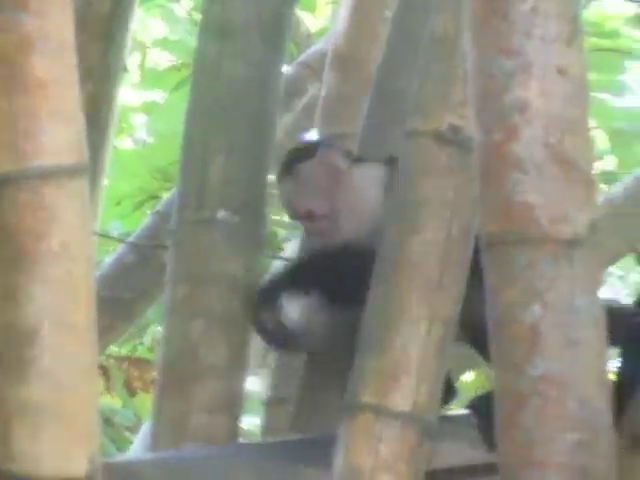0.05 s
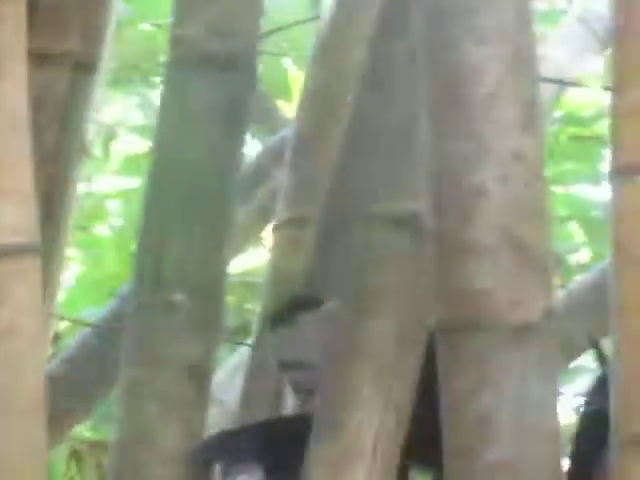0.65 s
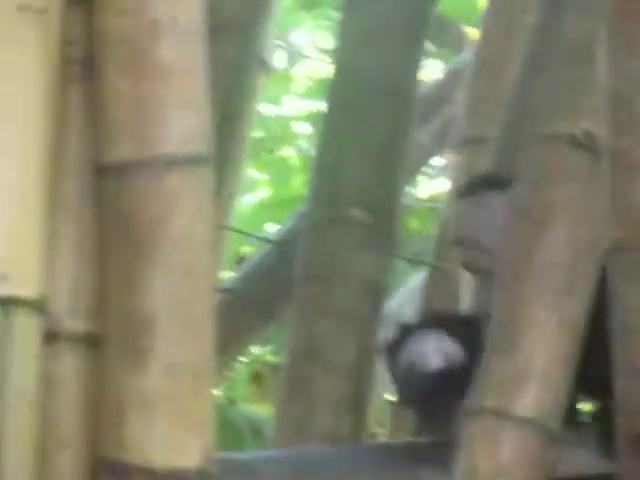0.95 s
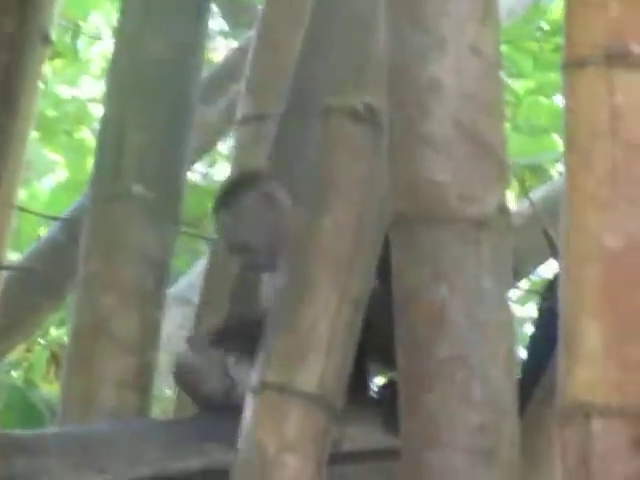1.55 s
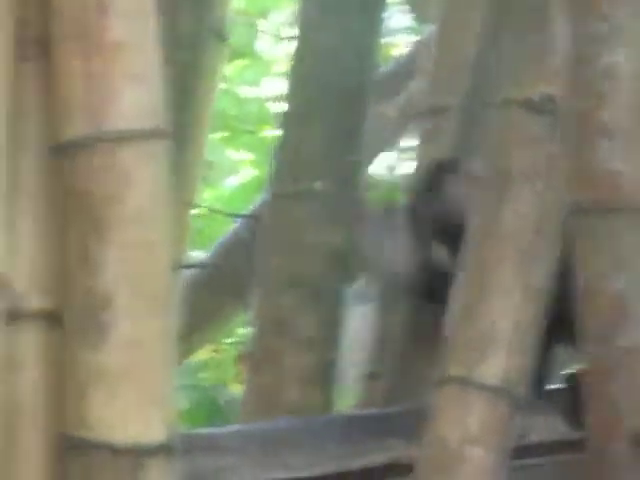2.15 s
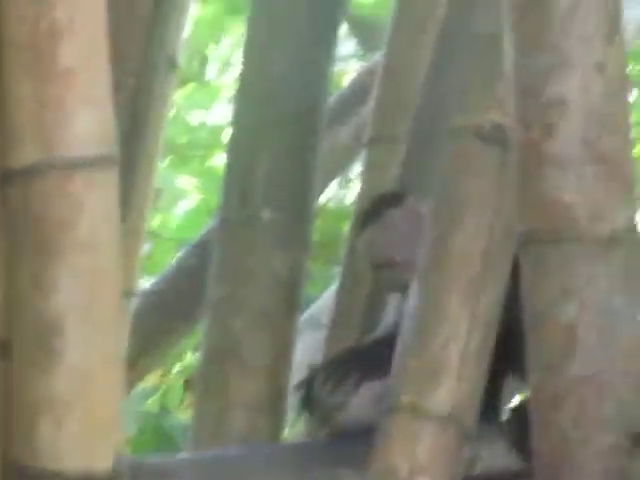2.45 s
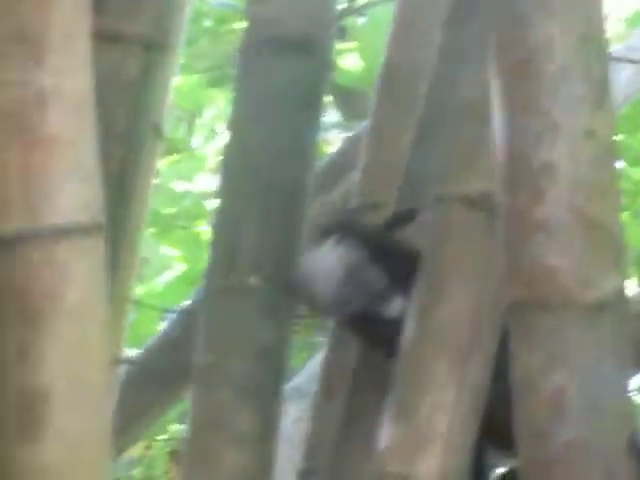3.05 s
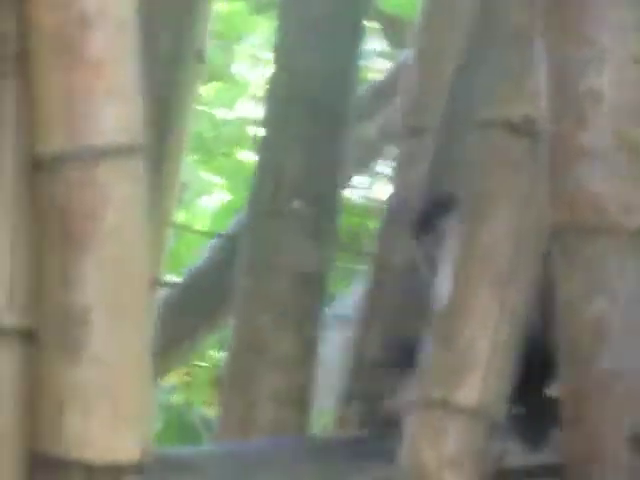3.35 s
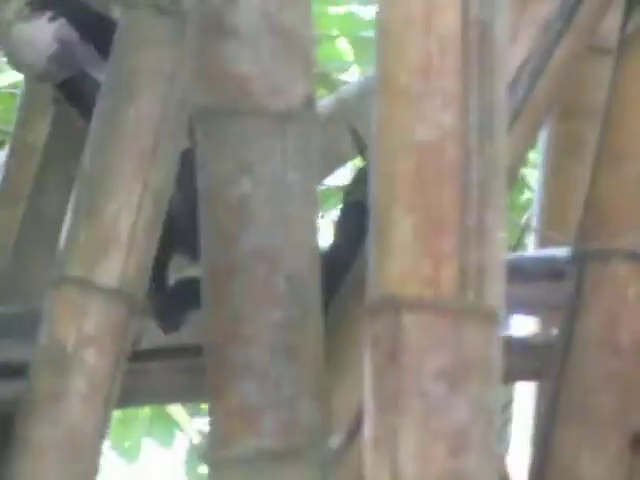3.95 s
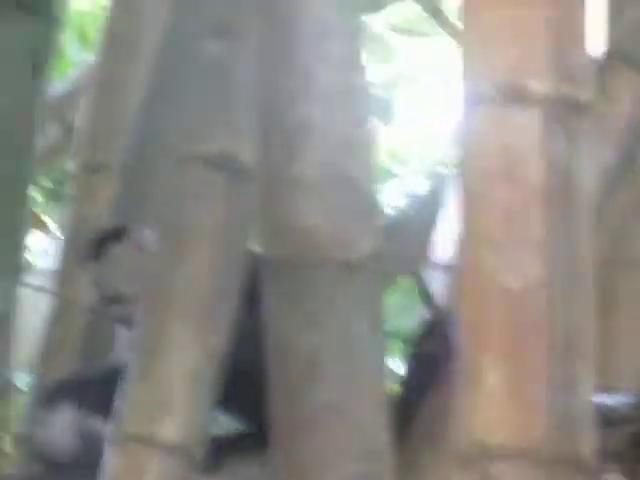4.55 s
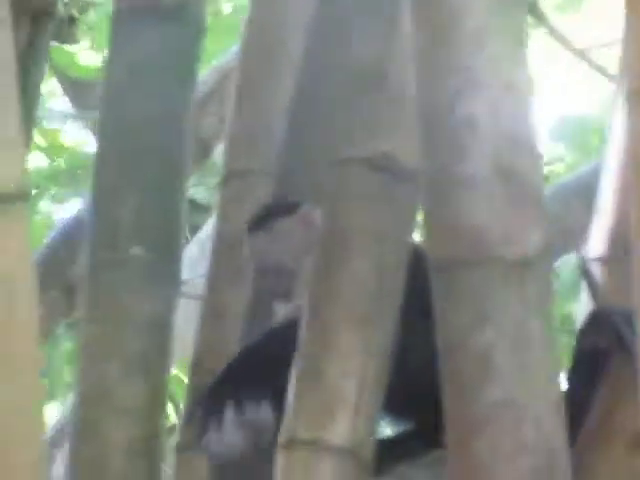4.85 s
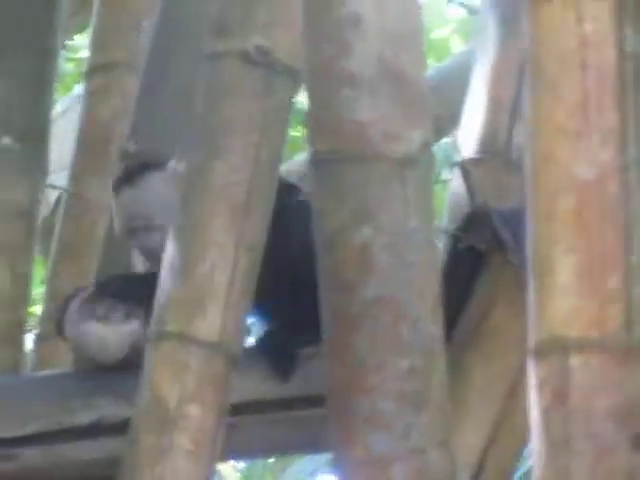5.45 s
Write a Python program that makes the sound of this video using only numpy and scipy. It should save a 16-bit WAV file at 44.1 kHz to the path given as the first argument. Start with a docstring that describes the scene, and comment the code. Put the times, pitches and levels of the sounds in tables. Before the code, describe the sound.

A monkey bangs a coconut on a wooden beam six times, about a second apart. Each blow is a sharp crack of hard shell with a hollow knock, ringing briefly in a large bamboo-filled enclosure. A soft wash of air runs underneath. In the first half a small bird gives two faint, high calls. Between blows come slight rustles of the nut, soft bumps on the microphone and, later, very faint distant hoots.

```python
"""Over a steady wash of air, a monkey pounds a coconut on a wooden beam: six blows about a second apart.
Each is a crack of the hard shell, then the hollow knock of nut and beam, scattered by the bamboo poles
of the enclosure and ringing on in the hall. A small bird gives two thin, high calls.
Between blows come faint rustles of the handled nut, soft bumps on the camera and far hoots."""
import sys
import numpy as np
from scipy import signal
from scipy.fft import rfft, irfft
from scipy.io import wavfile

SR = 44100
rng = np.random.default_rng(int(sys.argv[2]) if len(sys.argv) > 2 else 0)


def generate_wav(sig):
    """Save sig (samples, or channels by samples) to the path in sys.argv[1] as 16-bit PCM at SR."""
    pcm = np.round(np.clip(np.atleast_2d(sig).T, -1, 1) * 32767).astype(np.int16)
    wavfile.write(sys.argv[1], SR, pcm)


N = 250664

# hall decay: freq_hz, t60_s
HALL_DECAY = [(150, 0.32), (600, 0.94), (1500, 0.72), (3000, 0.77), (6000, 0.65), (9000, 0.59),
              (14000, 0.23)]


def from_db(db):
    """Decibels to gain."""
    return 10 ** (np.asarray(db) / 20)


def rms_one(x):
    """Scale to rms 1."""
    return x / np.sqrt(np.mean(x ** 2) + 1e-20)


def at_hz(points, hz):
    """Read a table on a log-frequency axis."""
    freq_hz, values = np.transpose(points)
    return np.interp(np.log(hz), np.log(freq_hz), values)


def bins_hz(size):
    """FFT bin frequencies, floored at 1 Hz."""
    return np.maximum(np.fft.rfftfreq(size, 1 / SR), 1)


def add(out, start_s, sound):
    """Mix a sound in at start_s."""
    start = round(start_s * SR)
    out[:, start:start + sound.shape[-1]] += sound[..., :N - start]


def fade(t, t60_s):
    """Exponential decay, 60 dB in t60_s."""
    return 1000 ** (-t / t60_s)


def rise(t, build_s):
    """Exponential approach to 1."""
    return 1 - np.exp(-t / build_s)


def swell(length_s):
    """Half-sine envelope."""
    return np.sin(np.linspace(0, np.pi, int(length_s * SR)))


def colour(x, spectrum):
    """Minimum-phase filter from rows of freq_hz, gain_db: nothing sounds before its cause."""
    size = 2 * len(x)
    cepstrum = irfft(np.log(from_db(at_hz(spectrum, bins_hz(size)))), size)
    cepstrum[1:len(x)] *= 2
    response = np.exp(rfft(cepstrum[:len(x)], size))
    return irfft(rfft(x, size) * response, size)[:len(x)]


def noise(spectrum, size):
    """Diffuse stereo noise, rms 1, from rows of freq_hz, density_db; channels agree best in the mids."""
    # left-right likeness: freq_hz, correlation
    likeness = [(40, -0.83), (110, -0.82), (190, -0.8), (300, -0.28), (600, 0.85), (1200, 0.88),
                (3000, 0.83), (7000, 0.62), (13000, -0.25)]
    hz = bins_hz(size)
    alike = np.clip(at_hz(likeness, hz), -.99, .99)
    mid, side = rfft(rng.standard_normal((2, size)))
    stereo = np.sqrt(1 + alike) * mid + np.sqrt(1 - alike) * side * [[1], [-1]]
    return rms_one(irfft(stereo * from_db(at_hz(spectrum, hz)), size))


def air(wash_db=-54.0):
    """Steady wash of air, faintly pitched at a few resonances."""
    # air colour: freq_hz, density_db
    spectrum = [(18, -62.5), (30, -17.5), (116, -14.5), (163, -12), (205, -8), (247, -9), (328, -10.5),
                (662, -10), (735, -9), (859, -11), (1000, -12), (2190, -16), (4090, -20.5), (7060, -27),
                (15000, -47.5)]
    # narrow resonances: centre_hz, width_hz, level_db
    resonances = [(628, 140, -63.5), (1237, 65, -74), (1444, 32, -66)]
    out = from_db(wash_db) * noise(spectrum, N)
    for centre_hz, width_hz, level_db in resonances:
        peak = signal.iirpeak(centre_hz, centre_hz / width_hz, fs=SR)
        out += from_db(level_db) * rms_one(signal.lfilter(*peak, rng.standard_normal(N)))
    return out


def rumble(level_db=-67.5):
    """Faint, steady low noise."""
    spectrum = [(20, -15), (60, -3.5), (120, 0.5), (220, -9.5), (500, -49), (2000, -76.5)]
    return from_db(level_db) * noise(spectrum, N)


def crack(t, tilt_db_per_oct, gain_db=1.5, crush_db=2.0, settle_db=-4.0):
    """One sharp contact, tiny fractures as the surface crushes, then a weaker settling of the shell."""
    # crack colour: freq_hz, gain_db
    spectrum = [(100, -25), (500, -11), (1150, 0), (1800, 6), (2350, 2), (3100, 5.5), (4000, -7.5),
                (5200, 4), (7800, 0.5), (10000, -9), (13000, -27.5), (16000, -37)]
    fractures = rng.standard_normal(len(t)) * fade(t, t60_s=0.0034)
    settling = rng.standard_normal(len(t)) * fade(t, t60_s=0.048)
    fractures *= from_db(crush_db) / np.linalg.norm(fractures)
    settling *= from_db(settle_db) / np.linalg.norm(settling)
    contact = t == 0
    force = np.roll(fractures + settling, SR // 4000) - contact   # contact leads by 0.25 ms
    tilted = [(hz, db + tilt_db_per_oct * np.log2(np.clip(hz, 2000, 9000) / 4000))
              for hz, db in spectrum]
    return from_db(gain_db) * colour(force, tilted)


def rattle(t, gain_db=-21.5, t60_s=0.11, build_s=0.00047):
    """Dense clatter of coloured noise that builds at once and dies within a tenth of a second."""
    # rattle colour: freq_hz, density_db
    spectrum = [(40, -46.5), (130, -12.5), (220, -5.5), (400, 4.5), (900, 6.5), (1800, 2.5), (3100, -3),
                (3900, -14.5), (5200, -15.5), (8000, -33), (11000, -32), (15000, -52)]
    envelope = fade(t, t60_s) * rise(t, build_s)
    clatter = colour(rng.standard_normal(len(t)) * envelope, spectrum)
    return from_db(gain_db) * clatter * np.linalg.norm(envelope) / np.linalg.norm(clatter)


def shell(t, spot_hz, contact_s=0.00028, spot_width_oct=0.2, off_spot_db=-11.5):
    """The hard shell rings briefly; the spot that lands favours modes near the spot_hz pitches."""
    # shell modes: pitch_hz, level_db, t60_s
    modes = [(900, -14.5, 0.056), (1183, -29, 0.053), (1834, -16, 0.034), (2754, -18, 0.034),
             (3080, -20.5, 0.015), (3340, -24.5, 0.03), (5050, -32, 0.051)]
    pitch_hz, level_db, t60_s = np.transpose(modes)[:, :, None]
    distance_oct = np.abs(np.log2(pitch_hz / spot_hz)).min(axis=1, keepdims=True)
    off_spot = 1 - np.exp(-(distance_oct / spot_width_oct) ** 2)
    strength = from_db(level_db + off_spot_db * off_spot)
    rings = strength * np.sin(2 * np.pi * pitch_hz * t) * fade(t, t60_s)
    return rings.sum(axis=0) * rise(t, contact_s)


def knock(t, contact_s=0.001, spread_db=1.38):
    """Nut and beam take up the blow, then ring; each blow shares out the force differently."""
    # modes of the nut on the beam: pitch_hz, level_db, t60_s
    modes = [(190, -32, 0.028), (348, -24, 0.16), (469.6, -10, 0.029), (632, -0.5, 0.032),
             (702, -12.5, 0.059), (775, -7.5, 0.033), (867, -12, 0.028), (980, -26, 0.06),
             (1069, -21, 0.059), (1217, -21, 0.057), (1285, -8.5, 0.013), (1484, -18, 0.023),
             (1598, -14.5, 0.012), (1826, -17.5, 0.014)]
    pitch_hz, level_db, t60_s = np.transpose(modes)[:, :, None]
    strength = from_db(level_db + spread_db * rng.standard_normal(pitch_hz.shape))
    rings = strength * np.sin(2 * np.pi * pitch_hz * t) * fade(t, t60_s)
    low_cut = signal.butter(2, 175, "high", fs=SR, output="sos")   # a small body radiates little bass
    return signal.sosfilt(low_cut, rings.sum(axis=0) * rise(t, contact_s))


def seating(t, level_db=-10.0, pitch_hz=1900, t60_s=0.0011):
    """Short snap as the nut bottoms out on the beam."""
    return from_db(level_db) * np.sin(2 * np.pi * pitch_hz * t) * fade(t, t60_s)


def hall_wash(t, gain_db=-31.0, build_s=0.002):
    """Diffuse reverberation builds, then dies away; the mids last longest."""
    # reverberation colour: freq_hz, density_db
    spectrum = [(59, -52), (100, -31), (208, -21), (324, -12), (502, -15), (594, -1.5), (904, -9.5),
                (1070, -4.5), (1630, -11), (2690, -12), (3920, -18), (5040, -16.5), (6910, -22),
                (9260, -27.5), (15000, -43)]
    wash = rfft(noise(spectrum, len(t)))
    centres_hz, t60s_s = np.transpose(HALL_DECAY)
    log_hz = np.log(bins_hz(len(t)))
    bands = [np.interp(log_hz, np.log(centres_hz), row) for row in np.eye(len(centres_hz))]
    tail = sum(irfft(wash * band, len(t)) * fade(t, t60_s) for band, t60_s in zip(bands, t60s_s))
    return from_db(gain_db) * tail * rise(t, build_s)


def reflect(x, envelope, gain_db):
    """Pass x through dense random reflections that follow the envelope."""
    paths = rng.standard_normal(len(x)) * envelope
    paths *= from_db(gain_db) / np.linalg.norm(paths)
    return signal.fftconvolve(x, paths)[:len(x)]


def hall_ring(body, t, gain_db=-21.0, t60_s=1.0, build_s=0.032):
    """The nut's notes linger in the hall."""
    tail = reflect(body, fade(t, t60_s) * rise(t, build_s), gain_db)
    return colour(tail, [(200, -12), (640, -8.0), (900, 1), (1200, 1), (2500, 5.0)])


def flutter(body, bounces=5):
    """Each group of reflectors returns an evenly spaced, dying run of echoes."""
    # nearest poles, far walls, across the hall: first_s, gap_s, gain_db, loss_db_per_bounce
    reflectors = [(0.0043, .0058, -15, 1.0), (.126, 0.012, -30.5, 2.3), (.0765, 0.091, -26.5, 6.5)]
    out = np.zeros_like(body)
    for first_s, gap_s, gain_db, loss_db in reflectors:
        for bounce in range(bounces):
            lag = round((first_s + bounce * gap_s) * SR)
            out[lag:] += from_db(gain_db - bounce * loss_db) * body[:len(body) - lag]
    return out


def scatter(body, t, gain_db=-11.5, t60_s=0.093, build_s=0.013, delay_s=0.0093):
    """The thicket of poles scatters the knock, filling out its first tens of milliseconds."""
    late_s = np.maximum(t - delay_s, 0)
    echoes = reflect(body, fade(late_s, t60_s) * rise(late_s, build_s), gain_db)
    return colour(echoes, [(220, -9), (350, 4), (600, -10), (900, 4.5), (1300, 5.5), (2500, -0.5)])


def blows(shell_lag_s=0.000821, knock_lag_s=0.001185, seat_lag_s=0.0032):
    """Crack first; shell and body ring once the surface yields. Returns direct and diffuse sound."""
    # blows, levels relative: start_s, knock_db, crack_db, tilt_db_per_oct, rattle_db, hall_db,
    # shell_db, low_spot_hz, high_spot_hz
    strikes = [(0.4752, 0.9, -5, -1, 2, -0.4, 2, 900, 5050),
               (1.4009, -1, -2, -4.5, -0.5, -1.5, 1, 1740, 3080),
               (2.2109, -0.7, 0, -1, 3.5, 1.9, -1.1, 1200, 3160),
               (3.3647, -2.5, 2.2, -1, 4, 3, -1.2, 2060, 2650),
               (4.3316, -0.5, -2, 5.5, 4, 0.95, -2.4, 1820, 3800),
               (5.414, -1.1, -3, 2, 2.2, -0.6, 1, 1150, 3470)]
    direct, diffuse = np.zeros((2, 2, N))
    t = np.arange(SR) / SR
    for start_s, knock_db, crack_db, tilt_db_per_oct, rattle_db, hall_db, shell_db, *spot_hz in strikes:
        body = from_db(knock_db) * knock(t)
        ring = from_db(shell_db) * shell(t, spot_hz)
        add(direct, start_s, from_db(crack_db) * crack(t, tilt_db_per_oct))
        add(direct, start_s, from_db(rattle_db) * rattle(t))
        add(direct, start_s + shell_lag_s, ring)
        add(direct, start_s + knock_lag_s, body + flutter(body) + scatter(body + ring, t))
        add(direct, start_s + seat_lag_s, seating(t))
        add(diffuse, start_s, from_db(hall_db) * (hall_wash(t) + hall_ring(body + ring, t)))
    return direct, diffuse


def whistle(length_s, first_hz, last_hz):
    """Pure note that swells, glides and fades."""
    envelope = swell(length_s)
    pitch_hz = np.linspace(first_hz, last_hz, len(envelope))
    return envelope * np.sin(2 * np.pi * np.cumsum(pitch_hz) / SR)


def bird(notes=4, step_s=0.061, note_s=0.0275, slide_hz=750, arch_hz=300, dry_db=-6.0, wet_db=1.5):
    """Arching runs of thin high notes, each sliding down, smeared by the hall."""
    # bird calls: start_s, pitch_hz, relative_db
    calls = [(0.96, 7100, -54), (2.75, 7900, -58)]
    out = np.zeros((2, N))
    for start_s, pitch_hz, relative_db in calls:
        for index, arch in enumerate(np.sin(np.linspace(0, np.pi, notes))):
            note_hz = pitch_hz + arch_hz * arch
            note = whistle(note_s, note_hz + slide_hz / 2, note_hz - slide_hz / 2)
            add(out, start_s + index * step_s, from_db(relative_db) * note)
    t = np.arange(SR // 2) / SR
    mean_pitch_hz = np.mean(calls, axis=0)[1]
    decay = fade(t, at_hz(HALL_DECAY, mean_pitch_hz))
    echoes = rms_one(rng.standard_normal((2, len(t))) * decay) / np.sqrt(len(t))
    wet = signal.fftconvolve(out, echoes, axes=1)[:, :N]
    return from_db(dry_db) * out + from_db(wet_db) * wet


def touches(events, spectrum):
    """Brief swells of friction noise."""
    out = np.zeros((2, N))
    for start_s, length_s, level_db in events:
        envelope = swell(length_s)
        friction = noise(spectrum, SR // 2)[:, :len(envelope)]
        add(out, start_s, from_db(level_db) * envelope * friction)
    return out


def rustles():
    """The nut rustles as it is handled."""
    # handling: start_s, length_s, level_db
    rubs = [(1.074, 0.035, -49), (1.208, 0.025, -53), (3.661, 0.016, -51), (5.158, 0.04, -49.5),
            (5.19, 0.11, -56.5)]
    return touches(rubs, [(100, 0), (850, -0.5), (2500, -8.0), (7000, -8.5), (15000, -36)])


def bumps(right_gain=0.71):
    """Soft bumps rock the camera, moving its two microphones in opposite senses."""
    # bumps on the camera body: start_s, length_s, level_db
    nudges = [(2.535, 0.03, -46), (2.962, 0.019, -25), (3.03, 0.29, -53.5), (3.295, 0.04, -36),
              (3.312, 0.016, -33), (3.487, 0.025, -41.5), (4.255, 0.037, -46)]
    thuds = touches(nudges, [(20, -9), (70, -2), (200, -9.0), (350, -29), (2000, -75)])[0]
    return thuds * [[1], [-right_gain]]


def hoots(rise_oct_per_s=0.2):
    """Distant calls drifting upwards; only the strongest partial carries."""
    # far hoots: start_s, length_s, pitch_hz, level_db
    calls = [(3.12, 0.15, 1066, -56.5), (3.93, 0.18, 658, -54.5), (3.98, 0.18, 872, -57),
             (4.75, 0.25, 826, -56)]
    out = np.zeros((2, N))
    for start_s, length_s, pitch_hz, level_db in calls:
        last_hz = pitch_hz * 2 ** (rise_oct_per_s * length_s)
        add(out, start_s, from_db(level_db) * whistle(length_s, pitch_hz, last_hz))
    return out


def bass_spread(x, cutoff_hz=150):
    """Closely spaced microphones turn a small bass mismatch into opposite swings left and right."""
    bass = signal.sosfilt(signal.butter(4, cutoff_hz, fs=SR, output="sos"), x.mean(axis=0))
    return x + bass * [[1], [-1]]


def microphone_dip(x, centre_hz=3900, q=1.47, depth=0.72):
    """Sound from all sides partly cancels in one band at the microphone ports."""
    notched = signal.lfilter(*signal.iirnotch(centre_hz, q, fs=SR), x)
    return (1 - depth) * x + depth * notched


def scene():
    """Blows in front, everything else faint around them."""
    direct, diffuse = blows()
    diffuse += air()
    lows = rumble()
    diffuse += rustles()
    lows += bumps()
    return bass_spread(direct) + microphone_dip(diffuse) + lows + bird() + hoots()


def record(dry, microphone_hz=13500, stopband_hz=16700):
    """The microphones lose the highest treble; the recorder cuts the top."""
    dull = signal.sosfilt(signal.butter(4, microphone_hz, fs=SR, output="sos"), dry)
    return signal.sosfilt(signal.cheby2(14, 70, stopband_hz, fs=SR, output="sos"), dull)


dry = scene()
out = record(dry)
generate_wav(out)
```